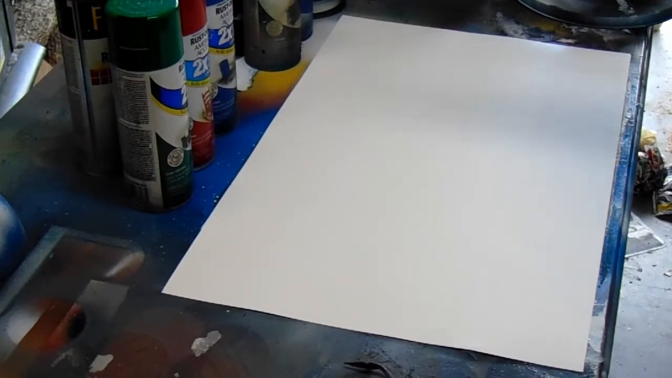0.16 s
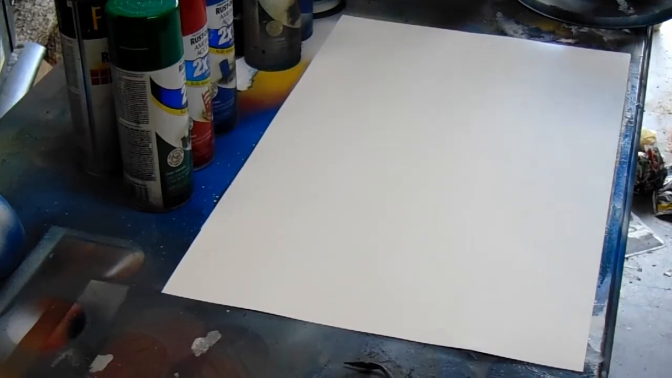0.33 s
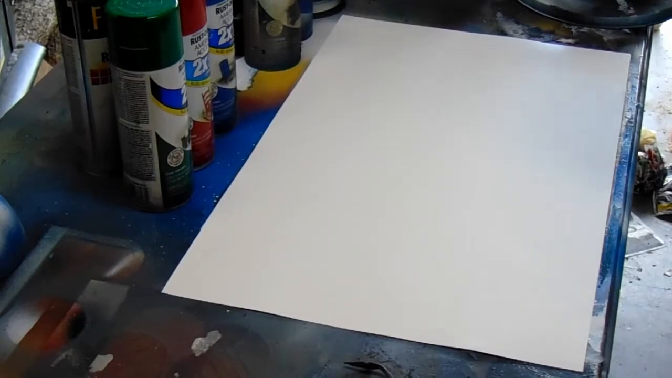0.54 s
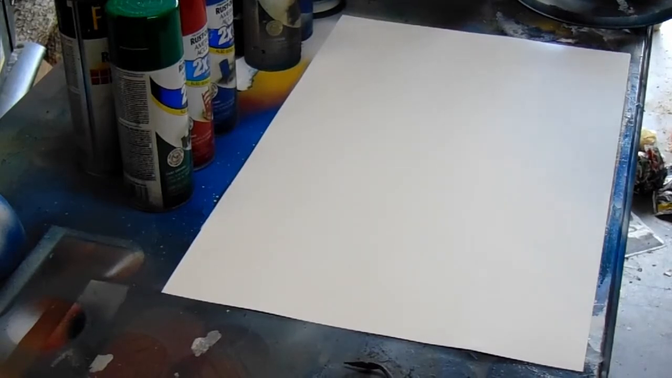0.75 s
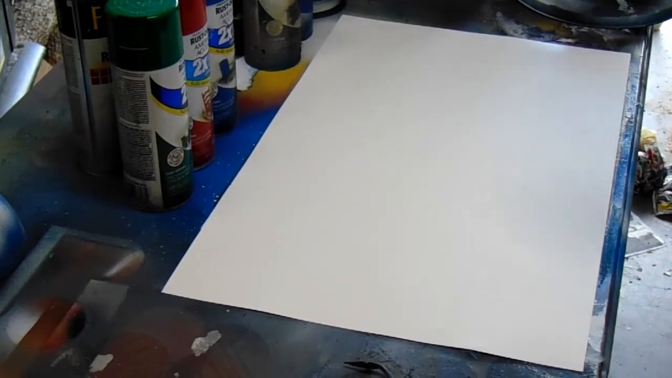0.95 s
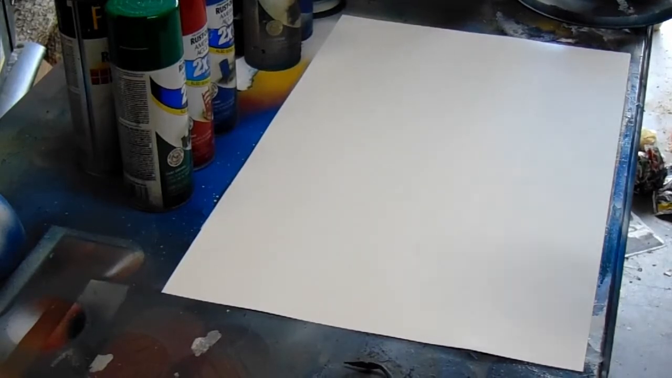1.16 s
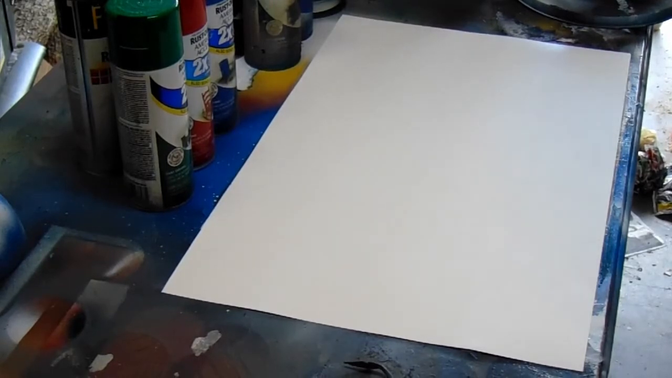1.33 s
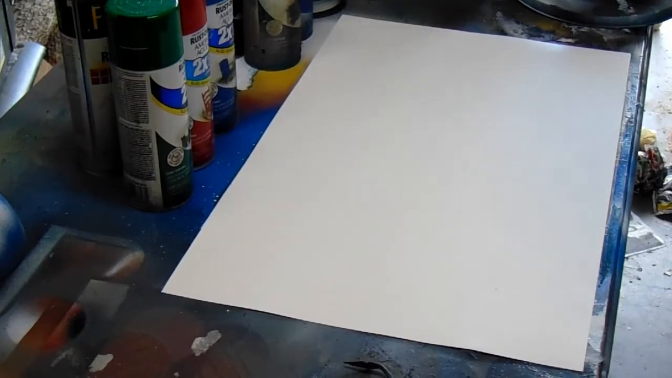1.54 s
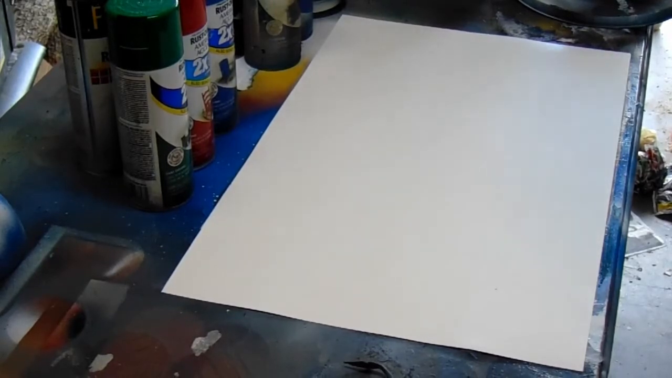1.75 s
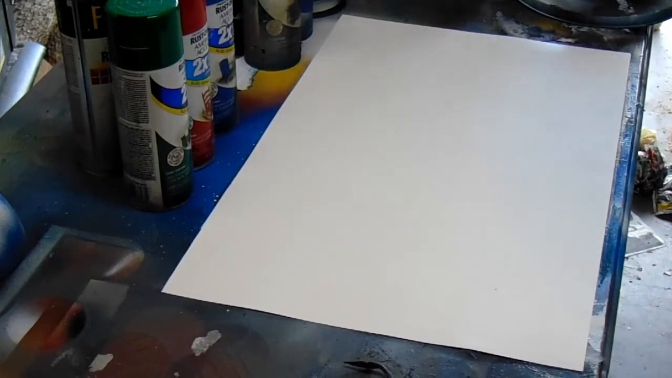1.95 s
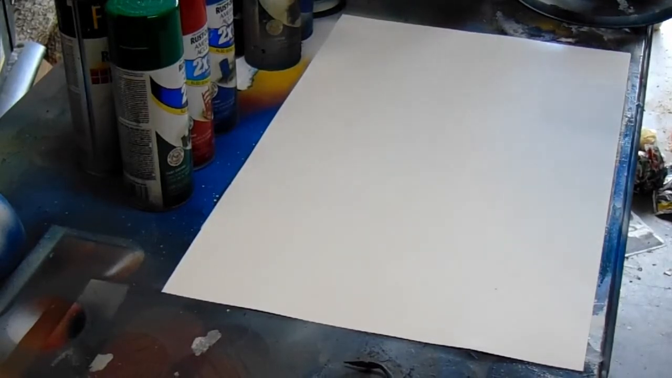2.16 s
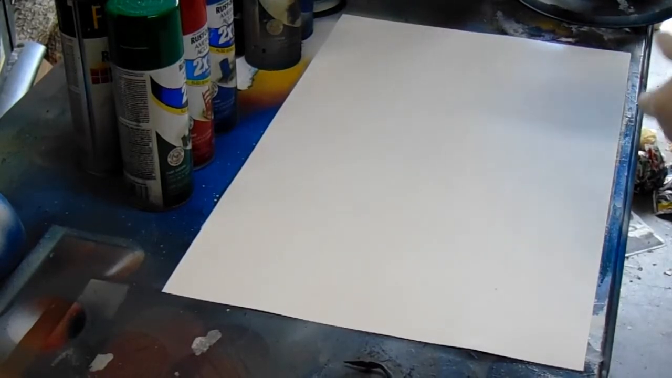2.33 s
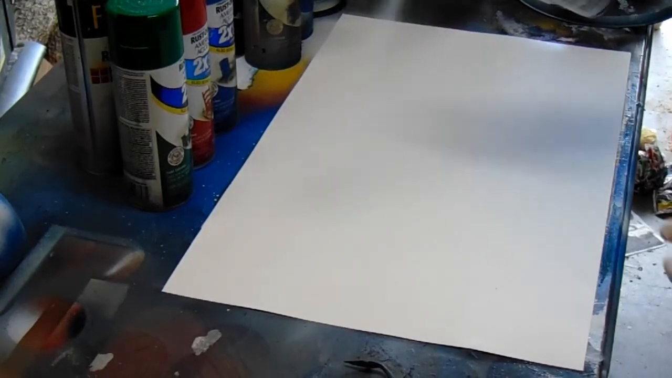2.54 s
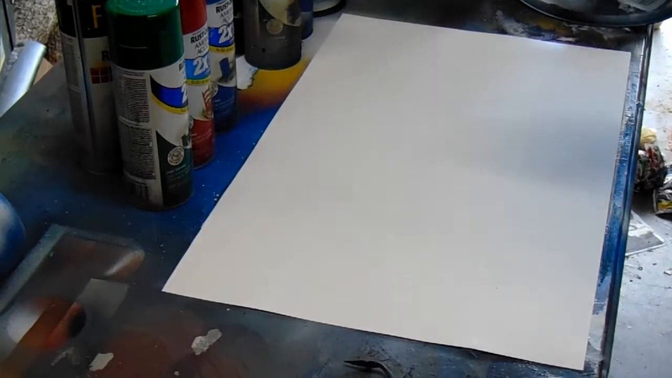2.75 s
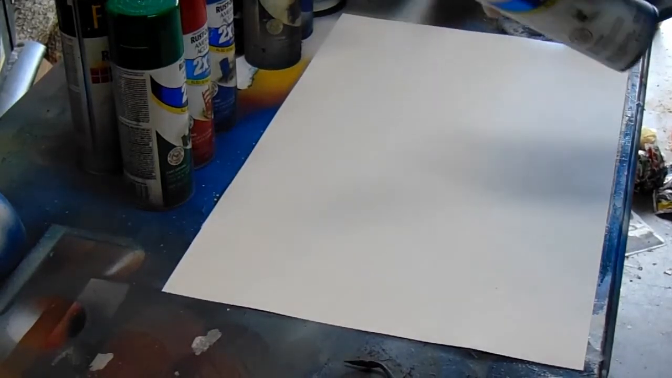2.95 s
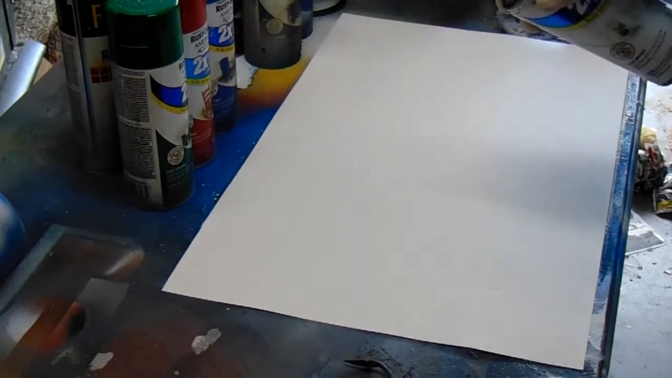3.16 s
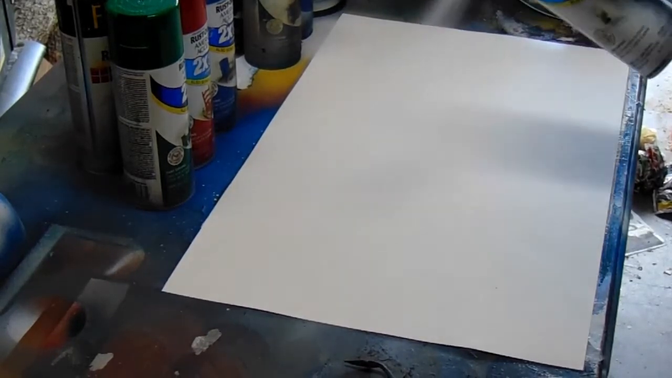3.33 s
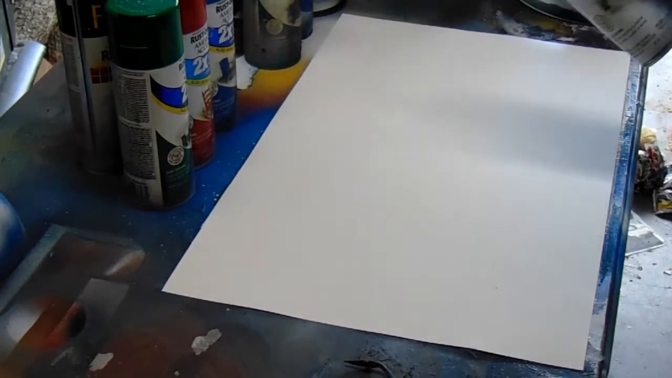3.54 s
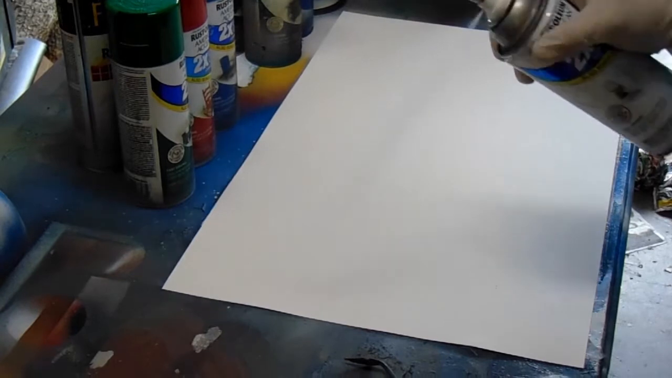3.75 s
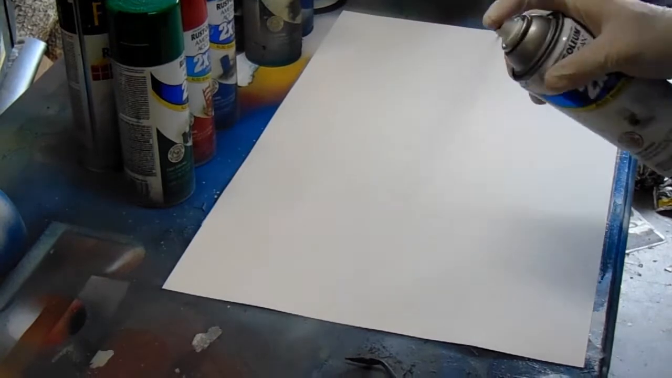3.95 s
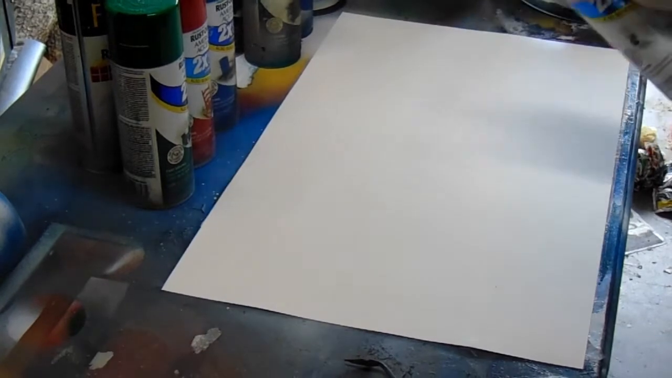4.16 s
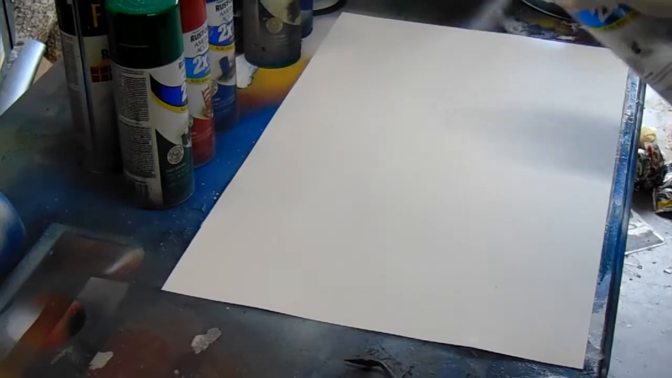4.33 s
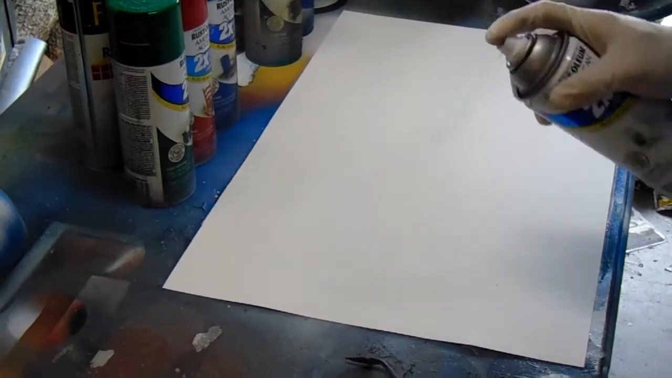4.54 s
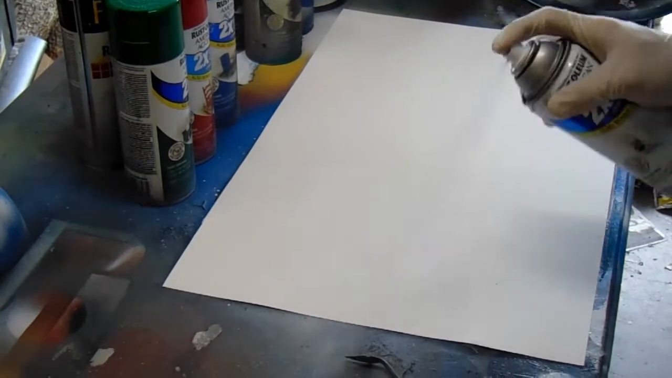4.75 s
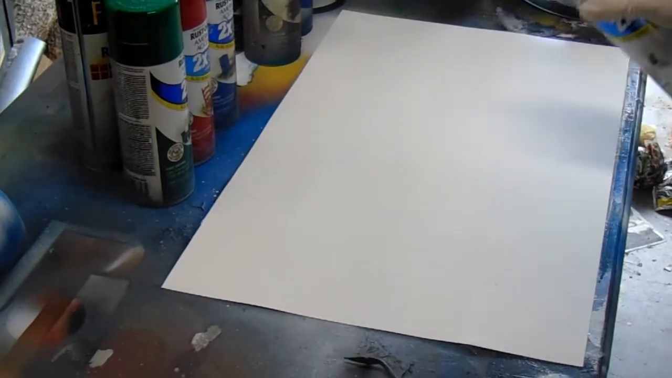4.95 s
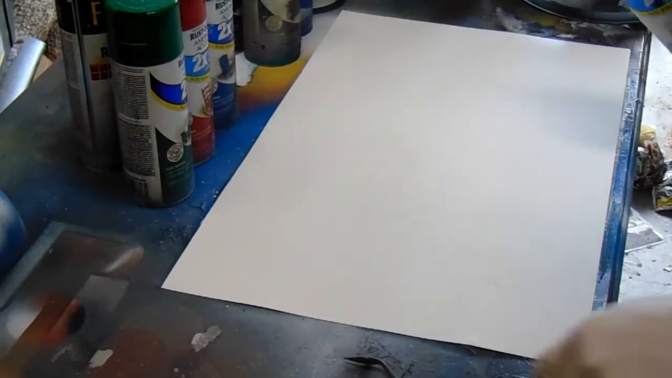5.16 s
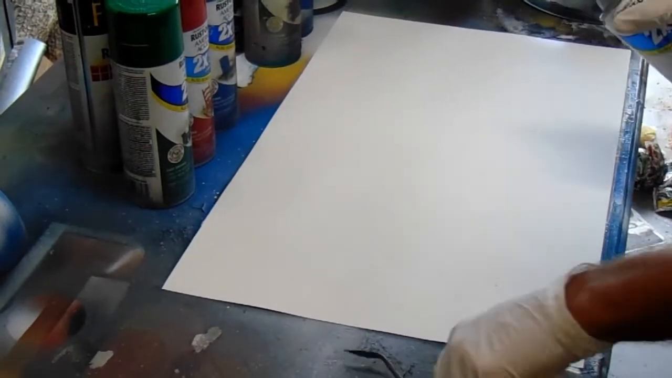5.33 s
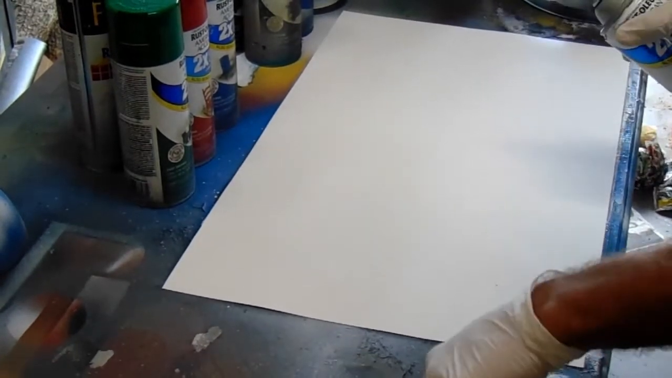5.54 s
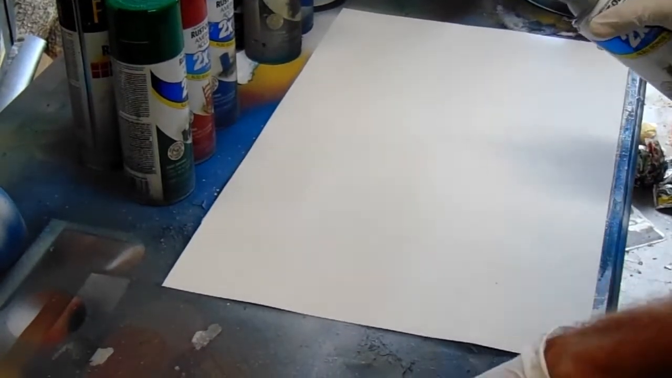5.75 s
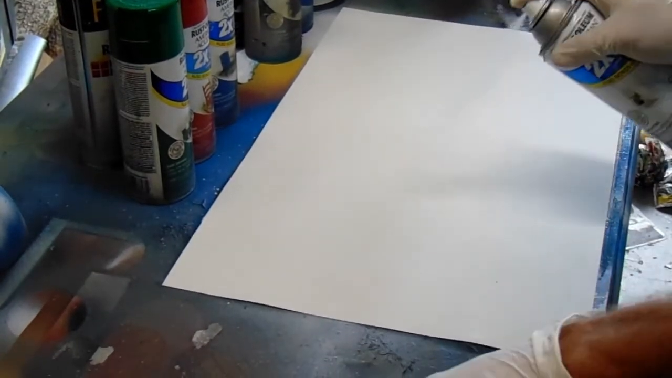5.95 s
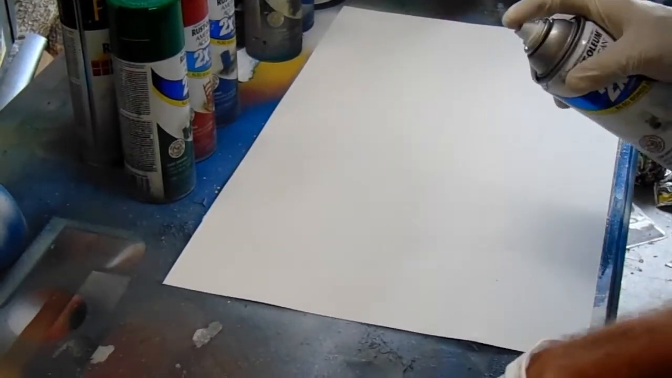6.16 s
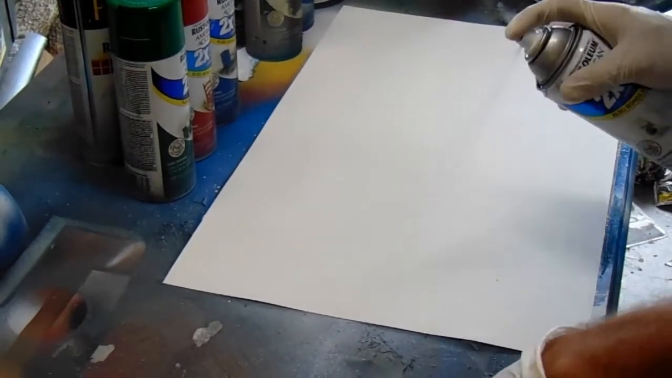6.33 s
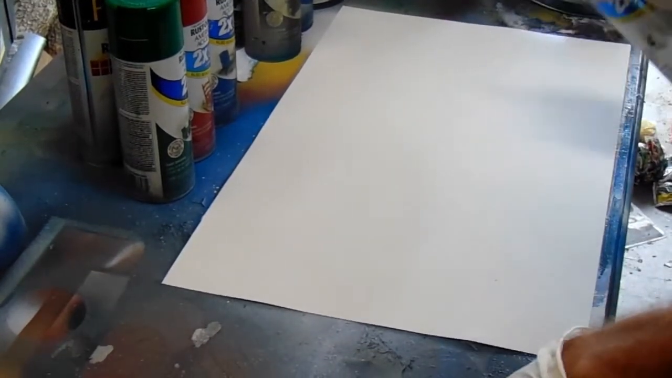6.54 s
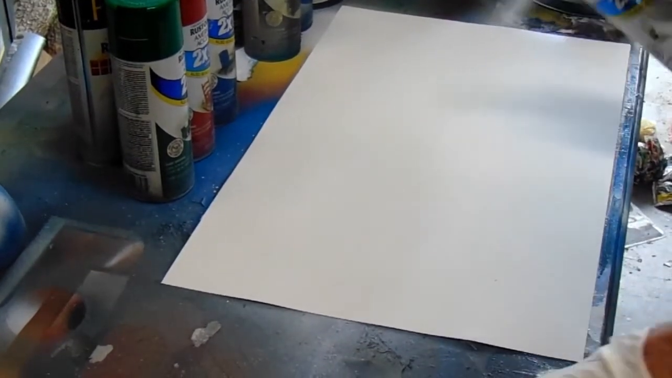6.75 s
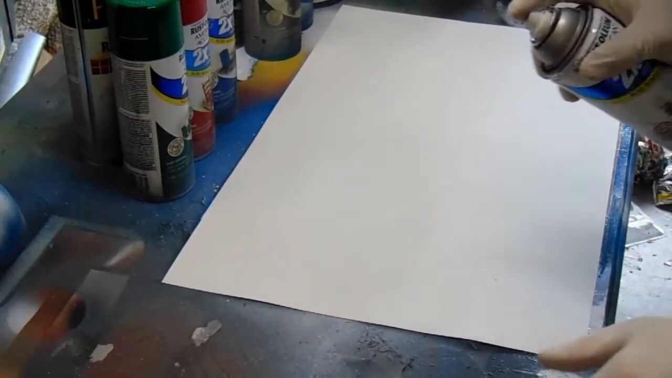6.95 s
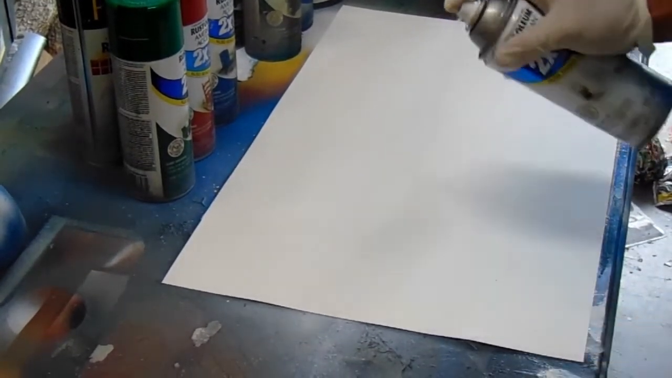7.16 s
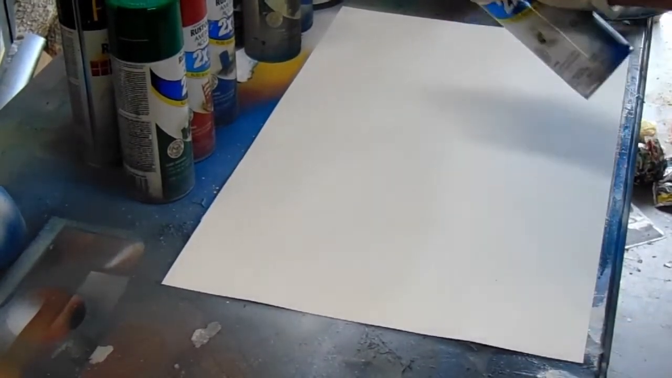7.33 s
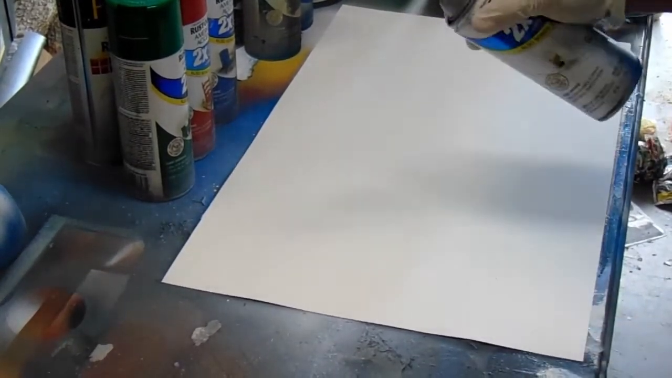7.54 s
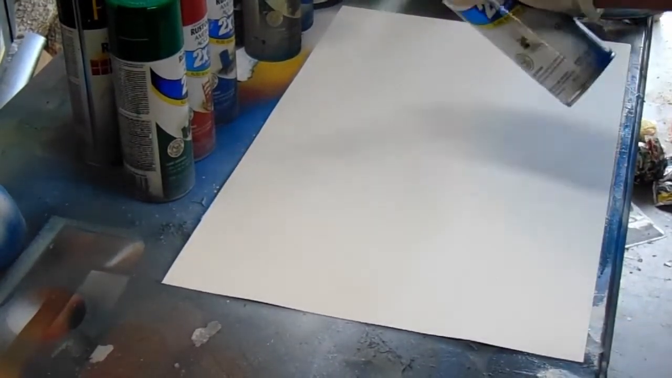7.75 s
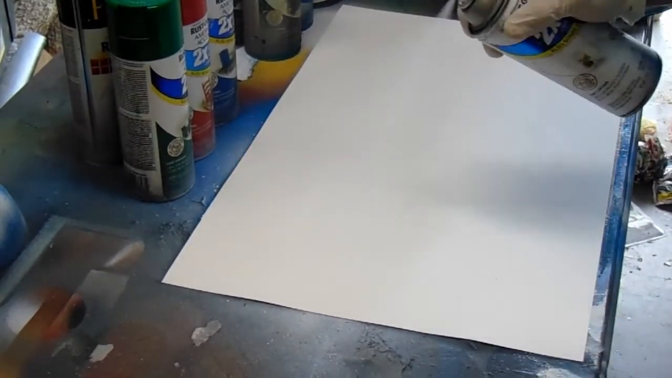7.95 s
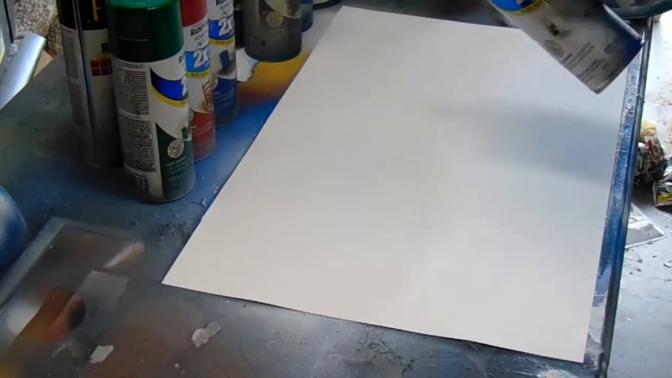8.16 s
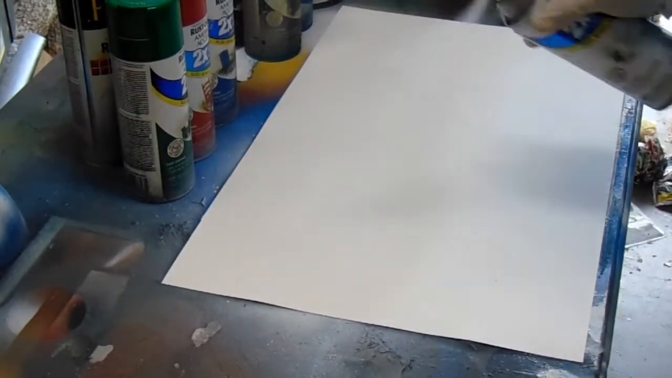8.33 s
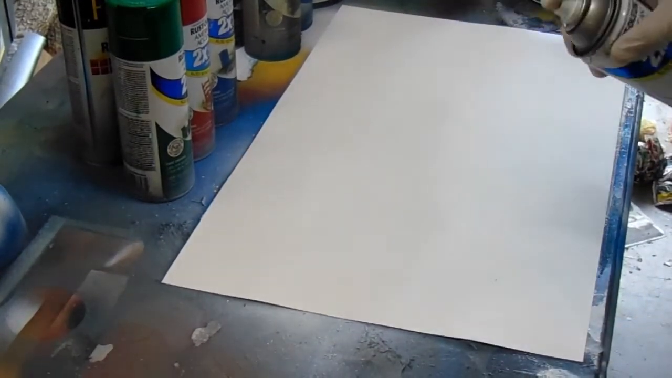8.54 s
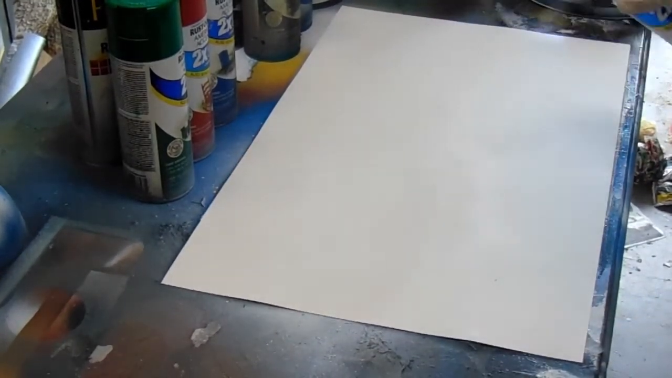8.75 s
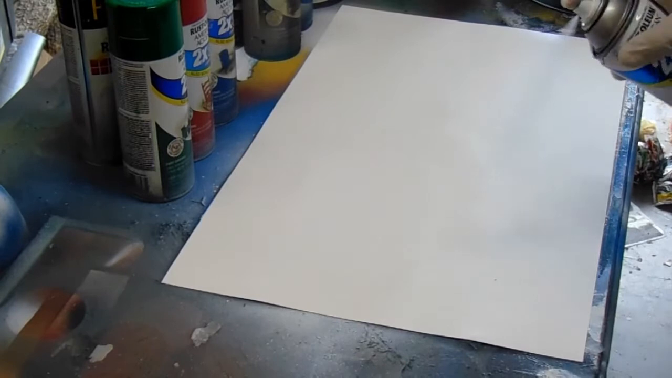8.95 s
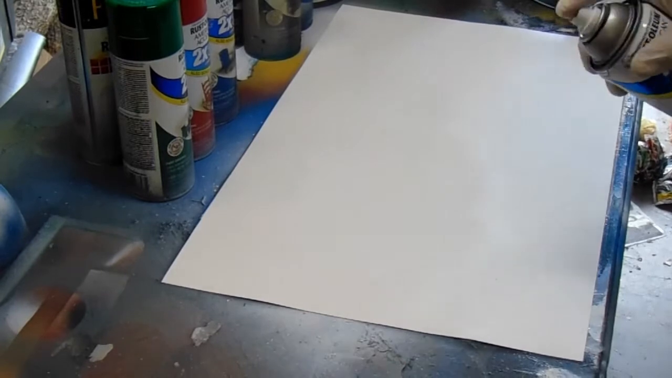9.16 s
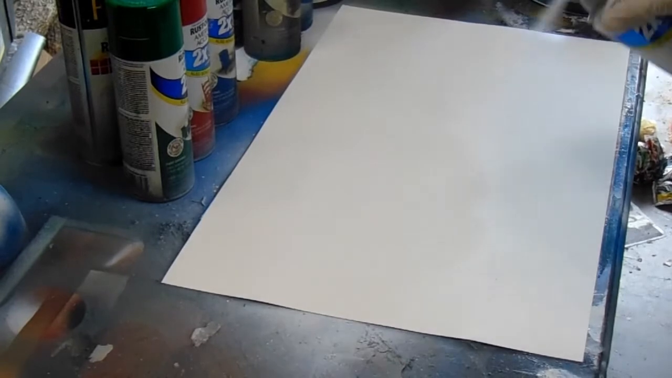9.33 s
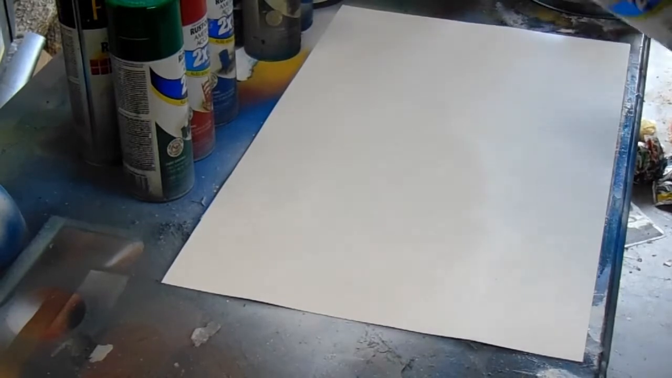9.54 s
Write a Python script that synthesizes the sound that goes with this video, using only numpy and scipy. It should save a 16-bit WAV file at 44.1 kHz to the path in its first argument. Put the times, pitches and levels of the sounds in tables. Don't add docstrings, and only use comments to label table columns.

```python
import sys
import numpy as np
from scipy import signal
from scipy.fft import rfft, irfft, next_fast_len
from scipy.io import wavfile
from scipy.ndimage import map_coordinates

SR = 44100
rng = np.random.default_rng(int(sys.argv[2]) if len(sys.argv) > 2 else 0)


def to_wav(s):
    ch = np.atleast_2d(s).T
    pcm = np.round(np.clip(ch, -1, 1) * 32767)
    wavfile.write(sys.argv[1], SR, pcm.astype(np.int16))


def invert_db(x):
    u = np.asarray(x, float) / 20
    return 10 ** u


N = 423360

# pitch_hz, density_db (per Hz)
FAN_SPECTRUM = [(12, -30), (20, -9.5), (123, -2.5), (145, -9.5), (237, -8.5), (434, -11), (471, -13.5),
                (555, -12.5), (711, -14), (962, -15), (3800, -19.5), (5000, -17.5), (14200, -27)]
# time_s, level_db
FAN_LEVEL = [(0.0, -63.5), (2.27, -59), (5.4, -57), (9.6, -56)]
# pitch_hz, level_db (rms)
HUM = [(58, -66), (120, -60.5)]

# start_s, peak_db, favoured_pitch_hz, ring_s
KNOCKS = [
    (1.011, -5.5, 607, 0.078),
    (1.022, -6.5, 1000, 0.047),
    (1.614, -9.5, 616, 0.1),
    (5.504, -16, 740, 0.092),
    (6.29, -23, 286, 0.35),
    (6.321, -19, 670, 0.084),
    (6.474, -24, 490, 0.14),
    (6.741, -26, 523, 0.07),
]
# pitch_hz, width_hz, level_db
BENCH_MODES = [(330, 240, -3), (510, 114, 4), (716, 33, 6.5), (726, 44, 6), (920, 90, -4.5),
               (1090, 130, -7.5), (2150, 170, -36), (3200, 450, -17), (4650, 640, -18)]
# pitch_hz, width_hz, level_db
BOARD_MODES = [(190, 130, -15), (275, 74, -2.5), (302, 38, 4), (400, 50, -2), (489, 30, -2), (645, 68, 0),
               (1000, 990, -15)]
# strongest_s, swell_s, die_away_s, board_db, grit_db
DRAGS = [(.003, 0.0034, .05, -71, -39.5), (.335, .005, .12, -69, -48), (.446, .015, .12, -56, -53),
         (1.06, .03, 0.049, -50, -45.5), (1.134, .005, 0.23, -60, -48.5), (1.64, .02, 0.14, -37, -48),
         (1.72, 0.1, 0.043, -60, -46.5), (2.468, 0.024, 0.064, -54, -60), (2.7, 0.29, 0.098, -57, -35),
         (5.426, 0.063, 0.052, -34, -50.5), (5.6, 0.0055, 0.098, -45, -44), (5.708, .2, 0.14, -23, -31),
         (5.814, .04, 0.15, -23, -35.5), (6.002, .01, 0.17, -38, -42.5), (6.298, .02, 0.068, -29.5, -57),
         (6.345, 0.049, 0.18, -30, -41.5), (6.485, 0.054, 0.21, -28.5, -38), (6.75, 0.067, 0.074, -29, -68)]
# pitch_hz, density_db (per Hz)
GRIT_SPECTRUM = [(500, -6), (1000, 3), (2500, 5), (5000, -2), (9000, -12.5), (14200, -18)]

# start_s, peak_db, lower_band_hz, upper_db, bright_db
RATTLE = [(0.032, -22, 2200, 0, -14), (.0445, -16, 2060, -4.5, -15), (.069, -21, 3150, -17, 2.5),
          (0.076, -30, 2960, 0, -10), (0.0843, -21.5, 3100, -17, -14), (0.096, -27.5, 1300, -7, -15),
          (.1456, -25, 1610, -14, -23), (.17, -29, 1500, -14, -15), (.182, -17, 2540, -1.5, 1.5),
          (.2085, -28, 1110, -4, -15), (.289, -28, 1240, -5, 4.5), (0.3037, -20, 2770, -1.5, -11),
          (.442, -35.5, 1930, -19, 5)]
# start_s, peak_db, lower_band_hz, upper_db, bright_db
TAPS = [(0.8008, -28, 1840, -13, -10), (.845, -24.5, 2370, -1.5, -30), (.9152, -29.5, 2210, -4, -25),
        (1.003, -26, 2090, -12, -24), (1.0126, -23.5, 1020, -1, -14), (1.136, -27, 1240, -17, -18),
        (1.1498, -29, 2730, -10, -20), (1.1955, -28, 1660, -3.5, -18), (1.6148, -20, 1770, -15, -18),
        (2.467, -27, 1590, -5.5, -15), (2.478, -27, 1570, -4.5, -6)]
# start_s, peak_db, lower_band_hz, upper_db, bright_db
BUMPS = [(5.3878, -35, 1240, -14, -9), (5.5035, -12, 1930, -10.5, -15.5), (5.5957, -8, 2700, -11.5, -18),
         (5.5987, -16.5, 2500, -31, -0.5), (5.6524, -12, 2550, -2.5, -22), (5.6564, -12, 2830, -9.5, -31),
         (5.751, -20.5, 2640, -5, -23), (5.8012, -19.5, 1490, -3, 0), (5.807, -19.5, 1230, -2, -3),
         (6.003, -14, 2730, -13, -18), (6.0078, -20.5, 2870, 1, -23), (6.32, -27.5, 1000, -4, -17),
         (6.468, -19.5, 2470, -1.5, -3), (6.5747, -22, 3020, -11, -3), (6.721, -22.5, 2650, -25, -28)]
# start_s, peak_db, lower_band_hz, upper_db, bright_db
TICKS = [(1.848, -49.5, 1200, -13, 14), (2.9168, -33, 2160, -3, 8), (3.3143, -37, 2630, -12, 2),
         (4.174, -22.5, 2600, -1.5, -12), (4.3862, -25.5, 2880, -1, 3), (5.1, -36, 2620, -2.5, -6),
         (7.71, -28.5, 2500, -4, -6), (8.0263, -22, 2500, -2, 2), (8.345, -43, 2630, 2, 5),
         (9.281, -35, 2630, -7, -3)]
# upper_band_hz, upper_width_hz, bright_edge_hz, hollow_top_db
CONTACT_KINDS = [
    (3970, 2330, 5700, -9),
    (3380, 1000, 7900, -8.5),
    (4530, 1770, 11000, -15),
    (3580, 1460, 6900, -10),
]

# strongest_s, swell_s, die_away_s, rustle_db
RUSTLE = [(.75, .02, .1, -64), (.804, .01, 0.17, -54), (1.146, .015, 0.27, -50.5), (1.7, .15, 0.082, -49),
          (2.478, .16, .04, -42)]
# pitch_hz, density_db (per Hz)
RUB_SPECTRUM = [(2000, -26), (5000, 0), (9000, 0), (14400, -3.5)]

# start_s, held_s, jet_db, body_db, fade_db (over the stroke)
STROKES = [(2.536, 0.16, -21, -40.5, 1), (2.918, 0.031, -29, -48, 2), (2.951, 0.13, -18.5, -42.5, -1),
           (3.322, 0.17, -21, -43, -1.5), (3.695, 0.17, -21.5, -43, 0.5), (4.055, 0.19, -21, -42, 0),
           (4.435, .200, -21, -43, 2), (4.81, 0.19, -20.5, -42, 0), (6.030, 0.17, -20.5, -41.5, 2),
           (6.398, 0.18, -19, -38.5, -2), (6.84, 0.17, -19.5, -41, 4.5), (7.185, .181, -16, -39, -1.5),
           (7.512, 0.15, -17.5, -38.5, 0.5), (7.786, 0.16, -18.5, -39, 0), (8.059, 0.15, -16.5, -39, -2),
           (8.376, 0.17, -18, -40.5, 1.5), (8.672, 0.19, -18.5, -41, -2), (9.004, 0.17, -19, -40.5, 2),
           (9.321, 0.18, -18, -40.5, -1.5)]
# pitch_hz, density_db (per Hz)
JET_SPECTRUM = [(180, -43), (300, -36), (512, -27), (602, -31), (1130, -24), (2200, -17), (2670, -12),
                (3040, -18.5), (3820, -14.5), (5280, -12), (7910, -5), (8860, -6), (12900, 1), (14400, -2)]

# start_s, level_db
HARD_BLOW = (5.504, -24)
# pitch_hz, level_db, t60_s
SHELL_MODES = [(1840, -4, 0.15), (1935, -5, .14), (2160, -3, .15), (2280, -2.5, .14), (2680, -8, .15),
               (3730, -9, .12), (3760, -9, 0.1), (4150, -21, .1), (4220, -10, .1), (5100, -30, .15),
               (5960, -14, .1), (10500, -24, .12)]

# pitch_hz, t60_s
ROOM_DECAY = [(300, 0.23), (1500, 0.32), (5000, 0.3), (14000, 0.23)]
# time_s, level_db
DISTANCE = [(0, 0), (.4, 1.5), (5.5, 0), (5.9, -7), (9.6, 2)]
# delay_s, level_db
WALLS = [(.004, -16.5), (.008, -33), (0.017, -30), (0.025, -47)]

SWELL_DB = 25
CRACK_S, CRACK_DB, SHUT_DB = .012, -4.5, -26
SURGE_S, SURGE_DB, SETTLE_S = 0.011, 2.5, 0.069
SPIT_DB, BODY_SHUT_DB, BODY_FADE = 4.5, -14.5, 0.5
CLOSE_S, CLOSE_DB, BODY_CLOSE_DB = 0.064, -28.5, -12
WHISTLE_HZ, WHISTLE_WIDE_HZ = 2500, 220
WHISTLE_DB, WHISTLE_S = -4, 0.059
TOP_HZ, BEAT_HZ, PEAK = 14210, 48.02, 0.8


def unit(x):
    return x / np.sqrt(np.mean(x ** 2) + 1e-20)


def along(points, hz):
    f, v = np.transpose(points)
    return np.interp(np.log(hz + 1), np.log(f + 1), v)


def gains(spans, column):
    t = np.arange(0, N, 16) / SR
    coarse = np.zeros(len(t))
    for span in spans:
        columns = np.transpose(span)
        coarse += invert_db(np.interp(t, columns[0], columns[column], left=-150, right=-150))
    return np.interp(np.arange(N) / SR, t, coarse)


def swells(rows, column):
    spans = []
    for row in rows:
        peak_s, level_db = row[0], row[column]
        spans.append([(peak_s - abs(row[1]), level_db - SWELL_DB),
                      (peak_s, level_db),
                      (peak_s + abs(row[2]), level_db - SWELL_DB)])
    return gains(spans, 1)


def wobble(rate_hz):
    knots = rng.standard_normal(int(N * rate_hz / SR) + 4)
    return map_coordinates(knots, [np.arange(N) * rate_hz / SR])


def filtered(x, response):
    m = next_fast_len(len(x) + SR // 5)
    hz = np.fft.rfftfreq(m, 1 / SR) + 1
    return irfft(rfft(x, m) * response(hz), m)[:len(x)]


def resonances(modes):
    def response(f):
        total = 0
        for k, (centre, width, db) in enumerate(modes):
            total = total + (-1) ** k * invert_db(db) * 1j * f * width / (centre * centre - f * f + 1j * f * width)
        return total
    return response


def band(centre_hz, width_hz):
    return lambda f: resonances([(centre_hz, width_hz, 0)])(f) ** 2


def above(edge_hz):
    return lambda hz: (hz ** 2 / (hz ** 2 - edge_hz ** 2 - 1j * np.sqrt(2) * hz * edge_hz)) ** 2


def noise(spectrum):
    return unit(filtered(rng.standard_normal(N), lambda hz: invert_db(along(spectrum, hz))))


def room_tone():
    t = np.arange(N) / SR
    time_s, level_db = np.transpose(FAN_LEVEL)
    fan = invert_db(np.interp(t, time_s, level_db) + 7.5) * noise(FAN_SPECTRUM)
    hum = np.zeros(N)
    for hz, db in HUM:
        level = invert_db(db + 2 + 1.3 * wobble(6.0))
        hum += level * np.sin(2 * np.pi * hz * t + 0.53 * wobble(9.5))
    return fan + hum


def drags():
    friction = invert_db(3.7 * wobble(60)) * rng.standard_normal(N)
    rumble = unit(filtered(friction, resonances(BOARD_MODES)))
    grit = unit(invert_db(3.5 * wobble(200)) * noise(GRIT_SPECTRUM))
    grit = invert_db(-0.5) * filtered(grit, above(510))
    return swells(DRAGS, column=3) * invert_db(-5.0) * rumble + swells(DRAGS, column=4) * grit


def clicks():
    out, t = np.zeros(N + SR), np.arange(SR // 10) / SR
    hollow = band(1135, 760)
    for rows, kind in zip((RATTLE, TAPS, BUMPS, TICKS), CONTACT_KINDS):
        high_hz, wide_hz, edge_hz, hollow_db = kind
        high, edge = band(high_hz, wide_hz), band(edge_hz, edge_hz)
        for start_s, db, low_hz, high_db, bright_db in rows:
            force = invert_db(-25 - 60 * t / .04) * rng.standard_normal(len(t))
            force[0] = 1
            low = band(low_hz, .5 * low_hz)
            low_share = np.sqrt(np.clip(1 - invert_db(high_db) ** 2, .03, 1))

            def shell(f):
                body = low_share * invert_db(3) * low(f) + invert_db(high_db + 3.0) * high(f)
                return body + invert_db(hollow_db) * hollow(f) + invert_db(bright_db - 8) * edge(f)

            out[round(start_s * SR):][:len(t)] += invert_db(db + 23.0) * filtered(force, shell)
    return out[:N]


def rustle():
    return swells(RUSTLE, column=3) * unit(invert_db(4.3 * wobble(150)) * noise(RUB_SPECTRUM))


def knocks():
    out, t = np.zeros(N + SR), np.arange(SR // 3) / SR
    for start_s, db, hz, ring_s in KNOCKS:
        shudder = rng.standard_normal(len(t)) * invert_db(-14.0 - 60 * t / max(ring_s, .01))
        shudder[0] = invert_db(15.5)
        plate = filtered(shudder, resonances(BENCH_MODES))
        spot = filtered(shudder, resonances([(hz, 160, 4)]))
        out[round(start_s * SR):][:len(t)] += invert_db(db + 7.5) * (plate + spot)
    return out[:N]


def whistle():
    puffs = []
    for start_s, held_s, jet_db, body_db, fade_db in STROKES:
        puffs.append((start_s, CRACK_S, WHISTLE_S * 2, body_db + WHISTLE_DB))
    breath = filtered(rng.standard_normal(N), band(WHISTLE_HZ, WHISTLE_WIDE_HZ))
    return swells(puffs, column=3) * unit(breath)


def stroke(start_s, held_s, jet_db, body_db, fade_db):
    end_s = start_s + held_s
    end_db, body_end_db = jet_db + fade_db, body_db + BODY_FADE * fade_db
    return [(start_s - CRACK_S, jet_db + SHUT_DB, body_db + BODY_SHUT_DB),
            (start_s, jet_db + CRACK_DB, body_db + SPIT_DB),
            (start_s + SURGE_S, jet_db + SURGE_DB, body_db + SURGE_DB),
            (start_s + SETTLE_S, jet_db, body_db),
            (end_s, end_db, body_end_db),
            (end_s + CLOSE_S, end_db + CLOSE_DB, body_end_db + BODY_CLOSE_DB)]


def jet():
    hiss = noise(JET_SPECTRUM)
    top = filtered(hiss, lambda hz: 1 / (1 + (9000 / hz) ** 4))
    body = filtered(hiss, lambda hz: 1 / (1 + (hz / 4200) ** 4))
    middle = hiss - body - top
    unsteady = invert_db(.7 * wobble(30))
    sputter = unit(invert_db(1.7 * wobble(450) + .7 * wobble(70) + 1.2 * wobble(12)))
    presses = [stroke(*row) for row in STROKES]
    spray = gains(presses, 1) * (middle + sputter * top)
    return unsteady * (spray + gains(presses, 2) * invert_db(18.5) * body)


def hard_blow():
    out, t = np.zeros(N + SR), np.arange(SR // 4) / SR
    start_s, blow_db = HARD_BLOW

    def waver():
        return map_coordinates(rng.standard_normal(64), [t * 150])

    ring = np.zeros(len(t))
    for hz, db, t60_s in SHELL_MODES:
        decay = invert_db(db - 60 * t / t60_s + 3.6 * waver())
        ring += decay * np.sin(2 * np.pi * hz * t + 1.6 * waver())
    out[round(start_s * SR):][:len(t)] = invert_db(blow_db) * ring
    return out[:N]


def room(near, far):
    out = np.pad(near, (0, SR))
    for delay_s, db in WALLS:
        out[round(delay_s * SR):][:N] += invert_db(db) * near
    step = SR // 6
    for start in range(0, N, step):
        hz, t, z = signal.stft(rng.standard_normal(SR // 3), SR, nperseg=256)
        decay = invert_db(-60 * t / along(ROOM_DECAY, hz)[:, None])
        tail = signal.istft(z * decay, SR, nperseg=256)[1]
        wet = signal.fftconvolve(far[start:start + step], tail / np.linalg.norm(tail))
        out[start + 200:][:len(wet)] += wet
    return out[:N]


def scene():
    bench = filtered(drags() + knocks(), above(142))
    handling = bench + clicks() + rustle() + hard_blow()
    spray = whistle() + jet()
    far = gains([DISTANCE], 1) * handling + invert_db(-5.0) * spray
    mono = room(handling + spray, far) + room_tone()
    return np.array([mono, mono])


def low_pass(x):
    return signal.sosfilt(signal.butter(12, 15300, fs=SR, output="sos"), x)


def record(dry):
    beat = np.cos(2 * np.pi * BEAT_HZ * np.arange(N) / SR - 2.05)
    treble = filtered(dry[0], lambda hz: (hz / 13000) ** 2.5)
    kept = filtered(dry[0] + .21 * beat * treble, lambda hz: 1 / (1 + (hz / TOP_HZ) ** 700))
    kept = kept / (1 + np.abs(kept / PEAK) ** 4) ** .25
    return low_pass(np.array([kept, kept]))


dry = scene()
out = record(dry)
to_wav(out)
```